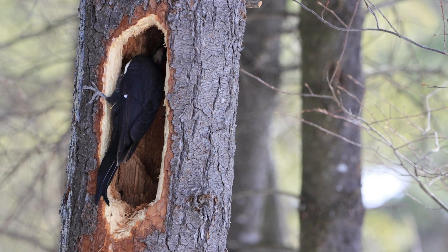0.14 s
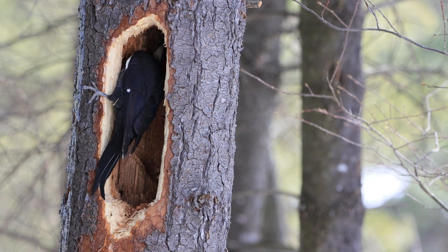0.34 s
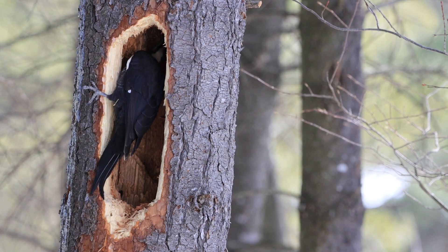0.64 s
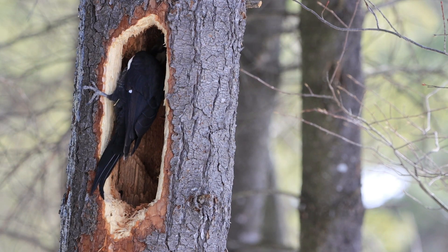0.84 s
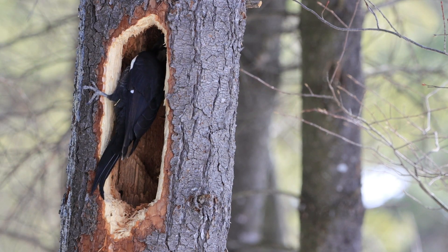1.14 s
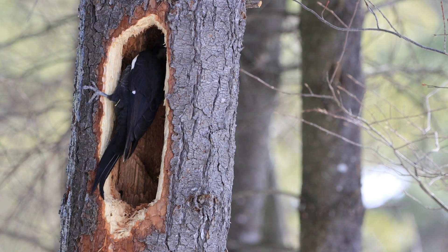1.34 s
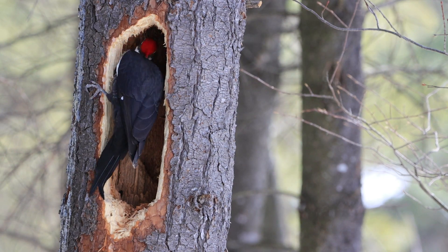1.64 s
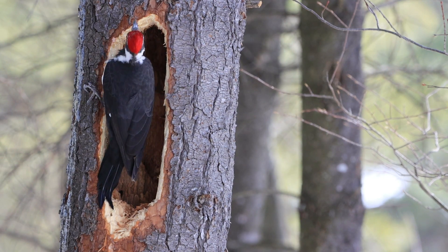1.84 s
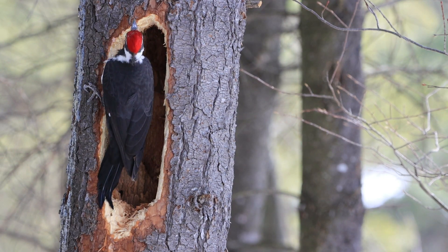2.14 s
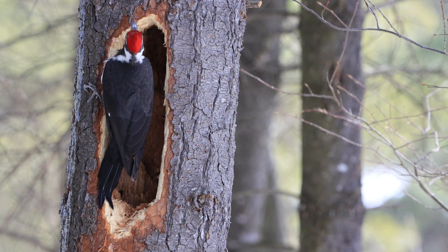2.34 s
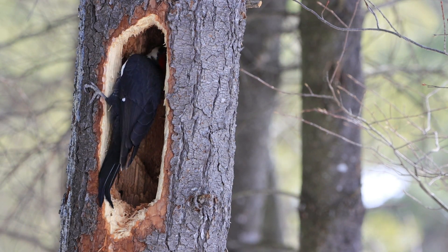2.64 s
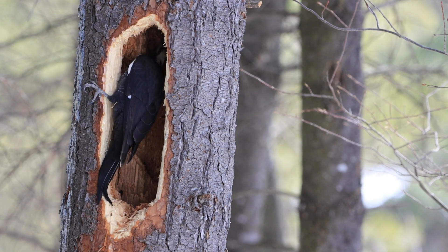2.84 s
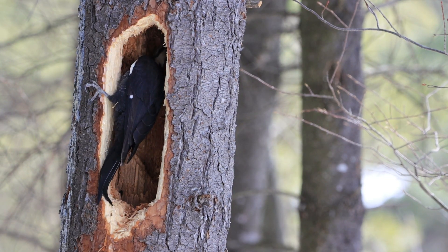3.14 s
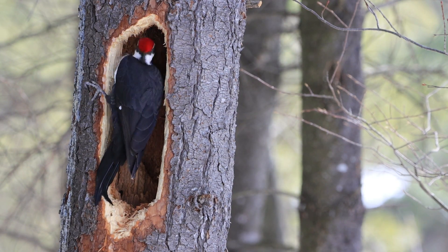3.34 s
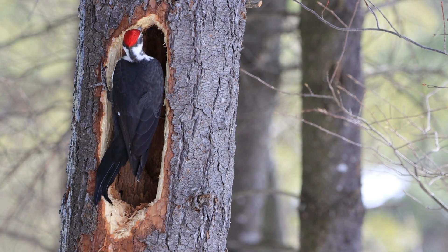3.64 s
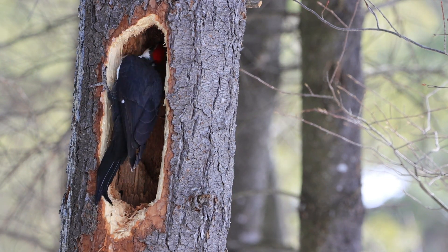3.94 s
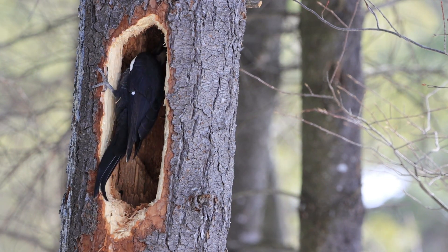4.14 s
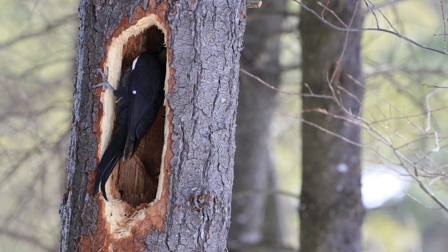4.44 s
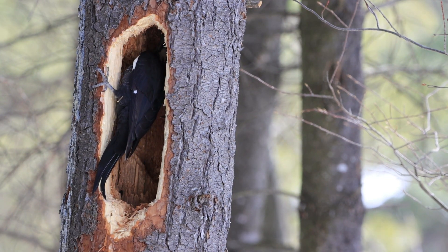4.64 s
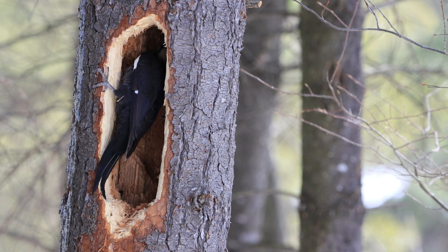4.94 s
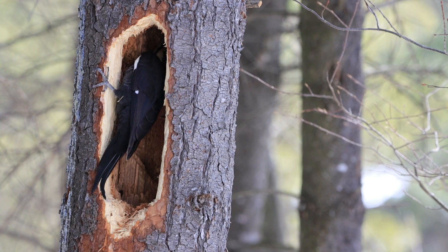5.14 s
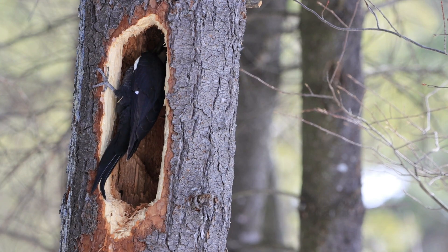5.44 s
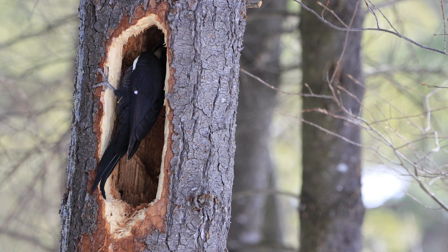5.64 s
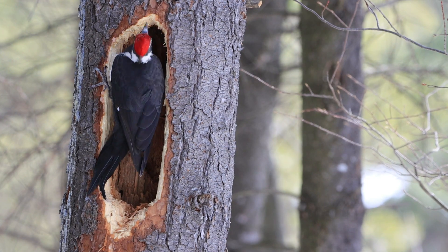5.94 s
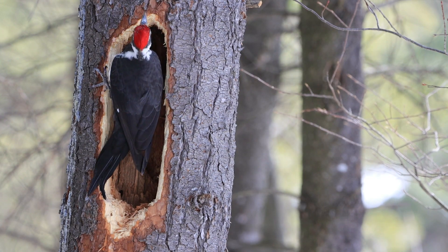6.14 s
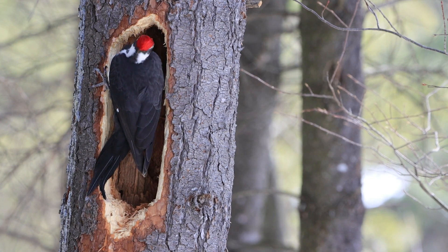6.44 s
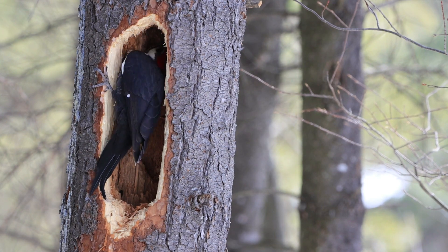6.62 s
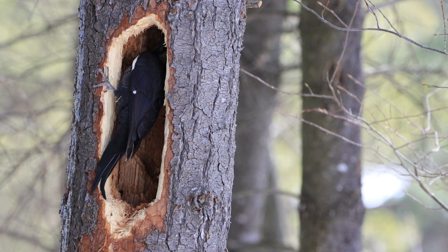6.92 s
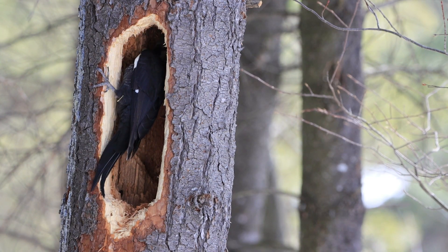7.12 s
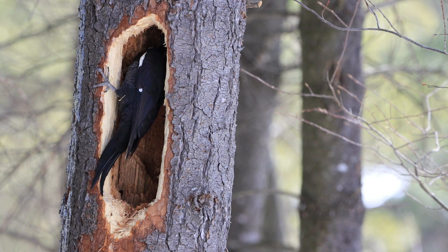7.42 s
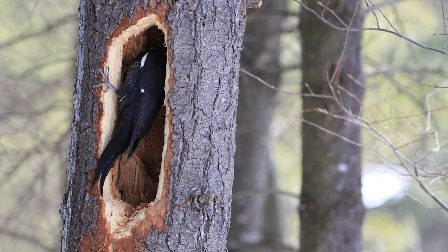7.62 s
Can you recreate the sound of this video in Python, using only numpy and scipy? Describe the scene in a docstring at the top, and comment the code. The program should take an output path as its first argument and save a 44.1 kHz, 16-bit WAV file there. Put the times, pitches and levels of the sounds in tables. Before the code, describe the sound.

Small birds trill and whistle in echoing woods, then a woodpecker's quick, ringing cackle rises over them before soft songbird phrases follow.

```python
"""A large woodpecker at its nest hole calls fifteen quick rising notes and ends on one low cluck.
Each call note is a tightening tone whose harmonics the throat weights; trunks and wood echo it.
Small birds farther off trill, whistle and chirp: pure tones bent in pitch, partly lost in echo.
Beneath lie a low rumble and a high hiss of filtered noise, the hiss swelling and fading, and a
steady sine hum."""
import sys
import numpy as np
from scipy import signal
from scipy.fft import rfft, irfft, next_fast_len
from scipy.io import wavfile

SR = 44100
rng = np.random.default_rng(int(sys.argv[2]) if len(sys.argv) > 2 else 0)


def transcribe(signal):
    """Save signal, clipped to [-1, 1], as a 16-bit WAV file at the path in sys.argv[1]."""
    frames = np.atleast_2d(signal).T
    limited = np.clip(frames, -1, 1)
    pcm = np.round(limited * 32767).astype(np.int16)
    wavfile.write(sys.argv[1], SR, pcm)


N = 343098
TIME = np.arange(N) / SR

# woodpecker notes: (time [s], length [s], level before throat and bill [dB])
NOTES = [(2.329, 0.053, -30.5), (2.473, .056, -29.5), (2.605, 0.056, -29.5), (2.729, 0.059, -29.5),
         (2.852, .054, -29), (2.974, 0.05, -28.5), (3.087, 0.06, -28), (3.207, 0.056, -27),
         (3.324, 0.053, -27), (3.44, .049, -26.5), (3.552, 0.0528, -27.5), (3.666, 0.047, -25.5),
         (3.782, 0.053, -26), (3.897, .052, -26.5), (4.012, 0.052, -26.5)]


def amp(db):
    """Decibels to gain."""
    return 10 ** (np.asarray(db) / 20)


def evened(x):
    """Scales to rms 1."""
    return x / np.sqrt(np.mean(x ** 2) + 1e-20)


def read(points, hz):
    """Interpolates (frequency [Hz], value) points on a log-frequency axis."""
    f, value = np.transpose(points)
    return np.interp(np.log(hz + 1), np.log(f + 1), value)


def add(mix, s, sound):
    """Mixes a sound in at time s, cut off at the end of the mix."""
    part = mix[max(round(s * SR), 0):][:len(sound)]
    part += sound[:len(part)]


def colour(x, points):
    """Filters by a spectrum of (frequency [Hz], gain [dB])."""
    size = next_fast_len(len(x) + 4096)
    gain = amp(read(points, np.fft.rfftfreq(size, 1 / SR)))
    return irfft(rfft(x, size) * gain, size)[:len(x)]


def waver(t, rate_hz):
    """Random drift of size about 1: straight lines between rate_hz random knots a second."""
    knots = rng.standard_normal(1024)
    return np.interp((t - t[0]) * rate_hz, np.arange(len(knots)), knots)


def whistle(rows, jitter):
    """Pure tone along rows of (time [s], pitch [Hz], level [dB]); jitter is a share of the pitch."""
    s, hz, db = np.transpose(rows)
    t = np.arange(s[0], max(s[-1], s[0] + .005), 1 / SR)
    pitch_hz = np.interp(t, s, hz) * (1 + jitter * waver(t, 500))
    turns = np.cumsum(pitch_hz) / SR
    level = np.sqrt(2) * amp(np.interp(t, s, db))
    return s[0], level * np.sin(2 * np.pi * turns) * signal.windows.tukey(len(t), .1)


def chirp(s, length, start_hz, middle_hz, end_hz, db, jitter, edge_db):
    """A whistle bent through three pitches; edge_db is the level of its ends against its middle."""
    u = np.linspace(0, 1, 9)
    parabola = np.polyfit([0, .5, 1], [start_hz, middle_hz, end_hz], 2)
    level_db = db + edge_db * (2 * u - 1) ** 2
    return whistle(np.transpose([s + u * length, np.polyval(parabola, u), level_db]), jitter)


def wood(x, near_db, near_s):
    """Echo of energy about 1: quick scatter from near trees, then a tail decaying per frequency."""
    # decay of the tail: (frequency [Hz], time to fall 60 dB [s])
    wood_t60 = [(1100, 2.5), (2350, 2.5), (3500, 0.5), (6000, 1.5), (11000, 1)]
    taps = rng.standard_normal(2 * SR) * (rng.random(2 * SR) < 2500 / SR)  # about 2500 a second
    hz, t, z = signal.stft(taps, SR, nperseg=256)
    tail = amp(-60 * t / read(wood_t60, hz)[:, None])
    near = 1 + amp(near_db) * np.exp(-t / near_s)
    onset = np.minimum(t / 0.0042, 1)
    fade = tail * near * onset
    fade /= np.sqrt(np.mean(fade ** 2, axis=1, keepdims=True))
    echo = signal.istft(z * fade, SR, nperseg=256)[1] / np.linalg.norm(taps)
    return signal.fftconvolve(x, echo)[:N]


def swell(s):
    """Level in dB shared by hiss and chorus: rise, hold, fade to almost nothing."""
    from_share, full_s, fade_start_s, fade_end_s = 0.47, 1.5, 4.96, 7.67
    rise = from_share + (1 - from_share) * s / full_s
    fade = (fade_end_s - s) / (fade_end_s - fade_start_s)
    return 20 * np.log10(np.clip(np.minimum(rise, fade), .004, 1))


def far_rumble(rumble_db=-50.0):
    """Low noise, left and right alike to a degree set per frequency by the mid/side balance."""
    # noise shape: (frequency [Hz], relative density [dB per Hz])
    rumble_shape = [(20, -31), (40, -16), (65, 0), (90, 1), (130, 0), (190, -4.5), (240, -9), (400, -11.5),
                    (750, -13.5), (1100, -19), (1700, -26), (2400, -32.5), (3500, -31.5), (15500, -41)]
    # left-right likeness: (frequency [Hz], correlation [0-1])
    likeness = [(60, 1), (250, 0.93), (450, 0.63), (800, 0.42), (1300, 0), (4000, 0.45)]
    same = np.clip(read(likeness, np.fft.rfftfreq(N, 1 / SR)), 0, 1)
    a, b = rfft(rng.standard_normal((2, N)))
    mid = colour(irfft(a * np.sqrt(1 + same), N), rumble_shape)
    side = colour(irfft(b * np.sqrt(1 - same), N), rumble_shape)
    level_db = rumble_db + 0.87 * waver(TIME, 15)
    return amp(level_db) * evened(np.array([mid + side, mid - side]))


def high_hiss(hiss_db=-44.0, width_db=-24):
    """Shaped noise, nearly central, that swells and fades."""
    # noise shape: (frequency [Hz], relative density [dB per Hz])
    hiss_shape = [(120, 7.5), (190, 18), (300, 4), (600, 9.5), (1100, 3.5), (2000, 4.5), (4000, 4),
                  (4900, 1.5), (5200, 10.5), (5950, 18.5), (6150, 7), (7200, 3), (9500, -6), (15500, 0)]
    mid, side = (evened(colour(noise, hiss_shape)) for noise in rng.standard_normal((2, N)))
    swell_db = swell(TIME) + 0.5 * waver(TIME, 25)
    return amp(hiss_db + swell_db) * (mid + amp(width_db) * np.array([side, -side]))


def steady_hum():
    """A sine near 288 Hz, slightly unsteady in pitch, a little louder on the left."""
    # hum: (time [s], level before the left-right tilt [dB])
    hum_levels = [(0, -50.5), (1.5, -48.5), (3, -51.5), (4.5, -49.5), (5.6, -49.5), (6.2, -55), (6.8, -52),
                  (7.3, -47), (7.78, -47.5)]
    turns = np.cumsum(287.9 + 0.36 * waver(TIME, 4.45)) / SR
    level = np.sqrt(2) * amp(np.interp(TIME, *np.transpose(hum_levels)))
    return level * np.sin(2 * np.pi * turns) * amp([[.8], [-.8]])


def background():
    """Rumble, hiss and hum together."""
    return far_rumble() + high_hiss() + steady_hum()


def chorus(db=-59, spread_db=5, count=170):
    """Many far birds, heard only by their echo, swelling and fading with the hiss."""
    out = np.zeros(N)
    for when, pitch, length, slide, size in rng.random((count, 5)):
        s, hz = when * N / SR, 2400 * 3.7 ** pitch
        end_s, end_hz = s + 0.0243 + 0.071 * length, hz * (.88 + .22 * slide)
        level_db = db + spread_db * (size - .5) + swell(s)
        add(out, *whistle([(s, hz, level_db), (end_s, end_hz, level_db)], jitter=0.023))
    return wood(out, near_db=-9, near_s=0.044)


def far_caller(start_s=.08, period_s=0.26, length_s=0.059, hz=2380, db=-53, count=8):
    """A far bird repeats a soft low note, loosely in time, heard only by its echo."""
    out = np.zeros(N)
    for k, (late, size) in enumerate(rng.standard_normal((count, 2))):
        s = start_s + k * period_s + .015 * late
        add(out, *chirp(s, length_s, hz, hz, hz, db + size, jitter=0.03, edge_db=-3))
    return wood(out, near_db=7.5, near_s=0.021)


def chirpers():
    """Distant chirps, two-voiced arching lisps and hoarse level buzzes, half lost in their echo."""
    # levels are before flutter and direct/echo gains
    # chirps: (time [s], length [s], start [Hz], middle [Hz], end [Hz], level [dB])
    chirps = [(0.232, .033, 3750, 3760, 3770, -53), (0.86, .03, 4660, 4500, 4350, -44),
              (0.92, 0.044, 7200, 7500, 7730, -35.5), (0.95, 0.045, 2790, 2500, 2290, -44.5),
              (1.068, 0.03, 2790, 2564, 2230, -36), (1.335, .057, 4500, 4830, 4830, -49),
              (1.216, 0.045, 2790, 2470, 2220, -37.5), (1.516, 0.058, 4080, 4500, 4480, -42),
              (1.67, 0.072, 4150, 4480, 4450, -42), (1.777, 0.086, 2134, 2747, 2160, -47.5),
              (1.817, 0.037, 4700, 4420, 4430, -42), (2.267, 0.075, 2500, 2700, 2660, -49.5),
              (3.317, .12, 6300, 6150, 6100, -40), (3.688, 0.056, 8500, 8320, 6150, -41),
              (4.016, .08, 7100, 6370, 6450, -43), (4.073, 0.016, 6400, 7530, 8000, -35),
              (4.295, 0.039, 3255, 3040, 2920, -50), (4.426, 0.048, 2750, 2500, 2450, -45),
              (4.53, 0.052, 7170, 7300, 8170, -40.5), (4.568, .05, 2250, 2400, 2580, -37.5),
              (6.434, 0.016, 6390, 7470, 8000, -32), (6.773, .033, 3000, 3210, 3300, -49)]
    # lisps: (time [s], length [s], mid pitch of lower voice [Hz], level [dB])
    lisps = [(0.477, 0.21, 6800, -49.5), (1.093, .22, 7330, -43), (3.18, 0.13, 6900, -48),
             (4.538, 0.2, 7800, -47.5), (5.368, 0.16, 7460, -42.5), (6.48, .22, 7270, -53.5),
             (7.156, .16, 7130, -54)]
    # buzzes: (time [s], length [s], pitch [Hz], level [dB], pitch jitter [share of pitch])
    buzzes = [(2.16, .27, 9000, -58, 0.014), (2.98, 0.47, 7060, -47, 0.026), (3.9, 0.52, 9000, -63, .012),
              (4.783, 0.39, 1407, -53, .14), (4.93, 0.35, 6940, -48.5, 0.034),
              (6.078, 0.28, 1460, -54.5, .12)]
    start_ratio, end_ratio, upper_ratio, upper_db = .93, .88, 1.21, -6.5
    out = np.zeros(N)
    for row in chirps:
        add(out, *chirp(*row, jitter=.026, edge_db=1))
    for s, length, hz, db in lisps:
        for voice_hz, voice_db in ((hz, db), (hz * upper_ratio, db + upper_db)):
            start_hz, end_hz = start_ratio * voice_hz, end_ratio * voice_hz
            add(out, *chirp(s, length, start_hz, voice_hz, end_hz, voice_db, jitter=0.0338, edge_db=-2))
    for s, length, hz, db, buzz in buzzes:
        add(out, *chirp(s, length, hz, hz, hz, db, jitter=buzz, edge_db=2))
    out *= amp(3.3 * waver(TIME, 70) - 3)  # the voices flutter
    return amp(-3.0) * out + amp(-4.0) * wood(out, near_db=10.0, near_s=0.13)


def trill(count=11, period_s=.0805, pip_s=.028, direct_db=-2.5, echo_db=-3):
    """Two thin trills: evenly spaced pips that sink slowly, swell and die away."""
    # trills: (start [s], peak time [s], start pitch [Hz], sink [Hz/s],
    #          peak level before direct/echo gains [dB], rise [dB/s], fall [dB/s])
    trills = [(0.322, 0.91, 6915, 425, -40, 9, 30), (0.404, .97, 3385, 105, -43.5, 22, 60)]
    out = np.zeros(N)
    for start, peak_s, start_hz, sink, peak_db, rise, fall in trills:
        for s in start + period_s * np.arange(count):
            hz = start_hz - sink * (s - start)
            db = peak_db - max(rise * (peak_s - s), fall * (s - peak_s))
            add(out, *chirp(s, pip_s, hz, hz, hz, db, jitter=.007, edge_db=-7))
    return amp(direct_db) * out + amp(echo_db) * wood(out, near_db=8, near_s=.08)


def whistlers(haze_hz=5950, haze_db=-7, steep_hz=7000, scatter_db=3):
    """Two long high whistles, one level, one falling; twigs scatter the highest part."""
    # thin level whistle: (time [s], pitch [Hz], level before direct/echo gains [dB])
    level_whistle = [(1.29, 6300, -38.5), (1.42, 6250, -33), (1.53, 6370, -28.5), (1.63, 6350, -33.5),
                     (1.8, 6470, -48.5)]
    # long falling whistle: same columns
    falling_whistle = [(2.37, 12160, -54), (2.415, 11300, -46), (2.445, 8900, -35.5), (2.495, 6670, -30.5),
                       (2.54, 6100, -26), (2.63, 5625, -24.5), (2.757, 5200, -25.5), (2.82, 4944, -30)]
    out = np.zeros(N)
    add(out, *whistle(level_whistle, jitter=0.013))
    add(out, *whistle(falling_whistle, jitter=.008))
    direct = colour(out, [(haze_hz, 0), (haze_hz + 1, haze_db)])  # a step down
    scattered = colour(out, [(steep_hz, 0), (steep_hz * 2.5, scatter_db)])
    return amp(-2.0) * direct + amp(-1.5) * wood(scattered, near_db=12.0, near_s=0.087)


def note(s, length, db, jitter=0.0018):
    """The syrinx tightens from slack into an arch; the throat picks out the second harmonic."""
    # throat response: (frequency [Hz], gain [dB])
    throat = [(750, -41.5), (930, -17), (1050, -5), (1200, -2), (1700, 10), (2050, -8), (2300, 12.5),
              (2400, 10), (2900, -16), (3280, -22), (3420, -3.5), (3600, -9.5), (4000, -43), (4700, -28),
              (7500, -43.5)]
    # the voice warms up: opening notes are lower, duller and slower to tighten
    warm_up_s, first_hz, full_hz, pitch_spread_hz = 0.386, 1070.7, 1202, 3.5
    cold_dull_db = -2  # per harmonic above the first
    slack_hz, tighten_s, cold_tighten_s, sag_hz, sag_s = 844, 0.00709, 0.011, 100.6, 0.0053
    attack_db, attack_s, release_db, release_s = -13, 0.0047, -30, 0.0036
    shut_db, open_s = -4, 0.027  # the bill opens
    t = np.arange(0, length, 1 / SR)
    cold = np.exp(-(s - NOTES[0][0]) / warm_up_s)
    top_hz = full_hz + (first_hz - full_hz) * cold + pitch_spread_hz * rng.standard_normal()
    slack = np.exp(-t / (tighten_s + cold_tighten_s * cold))
    sag = sag_hz * np.exp((t - length) / sag_s)
    hz = (top_hz + (slack_hz - top_hz) * slack - sag) * (1 + jitter * waver(t, 900))
    phase = 2 * np.pi * np.cumsum(hz) / SR
    voice = np.zeros(len(t))
    for k in range(1, 6):
        harmonic_db = read(throat, k * hz) + cold_dull_db * cold * (k - 1)
        voice += amp(harmonic_db) * np.sin(k * phase)
    attack = attack_db * np.exp(-t / attack_s)
    release = release_db * np.exp((t - length) / release_s)
    bill_db = shut_db * np.maximum(1 - t / open_s, 0)
    level = np.sqrt(2) * amp(db + attack + release + bill_db)
    return s, level * voice * signal.windows.tukey(len(t), .08)


def woodpecker():
    """The near call, its echoes from single trunks, and the ring of the wood."""
    # closing cluck: (time [s], length [s], start [Hz], middle [Hz], end [Hz])
    cluck = (4.139, .034, 1520, 1680, 1540)
    # nearest trunks: (delay [s], echo gain [dB])
    trunks = [(.012, -13), (.031, -26), (.058, -20), (.074, -21.5)]
    # what the wood returns: (frequency [Hz], gain [dB])
    wood_return = [(1150, -14.5), (1700, -16.5), (2050, 2), (2350, -6), (3500, -8.5), (6000, -15)]
    call, echoes = np.zeros(N), np.zeros(N)
    for row in NOTES:
        add(call, *note(*row))
    add(call, *chirp(*cluck, db=-28.5, jitter=0.0047, edge_db=-10.5))
    for delay_s, db in trunks:
        add(echoes, delay_s, amp(db) * call)
    return call + echoes + wood(colour(call, wood_return), near_db=4.5, near_s=0.083)


def songbird(pip_echo_db=-6, flutter_db=3):
    """Slur, pip and upstroke, three phrases a second; the high pip carries least into the wood."""
    # phrases: (time [s], slur level [dB], pip level [dB], upstroke level [dB]),
    # before stroke levels, flutter and direct gain
    phrases = [(5.41, -55, -54, -41.5), (5.746, -42, -44, -35.5), (6.084, -40.5, -41, -35),
               (6.418, -40, -43, -37), (6.756, -44.5, -48, -42), (7.105, -51.5, -47, -53)]
    # strokes by syllable: (delay into phrase [s], length [s], start [Hz], end [Hz],
    #                       level against the syllable [dB])
    syllables = {"slur": [(.012, 0.0834, 1740, 1980, -5), (.088, .07, 2125, 2397, 2.5)],
                 "pip": [(.188, .014, 3820, 4230, 0), (.196, 0.0083, 3120, 3220, -5)],
                 "upstroke": [(.249, 0.0248, 2395, 3097, 5.5)]}
    out = np.zeros(N)
    for s, *levels in phrases:
        for strokes, syllable_db in zip(syllables.values(), levels):
            for delay, length, start_hz, end_hz, stroke_db in strokes:
                middle_hz = (start_hz + end_hz) / 2
                db = syllable_db + stroke_db
                add(out, *chirp(s + delay, length, start_hz, middle_hz, end_hz, db, jitter=.013, edge_db=-3))
    out *= amp(flutter_db * waver(TIME, 110) - 1.5)  # the voice flutters
    sent = colour(out, [(2900, -3.5), (3800, pip_echo_db)])
    return amp(-5.5) * out + wood(sent, near_db=13.5, near_s=0.063)


def scene():
    """All the birds sit in the middle of the background."""
    near = woodpecker() + whistlers() + trill() + songbird()
    far = chirpers() + far_caller() + chorus()
    return near + far + background()


def record(dry, edge_hz=15800):
    """Limits the band with a linear-phase low-pass."""
    taps = signal.firwin(511, edge_hz, window=("kaiser", 9), fs=SR)
    return signal.oaconvolve(dry, taps[None], "same", axes=1)


dry = scene()
out = record(dry)
transcribe(out)
```